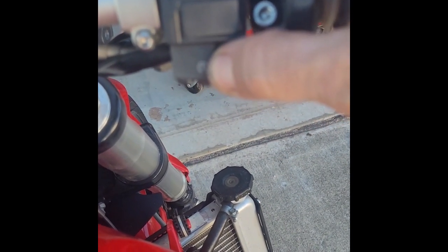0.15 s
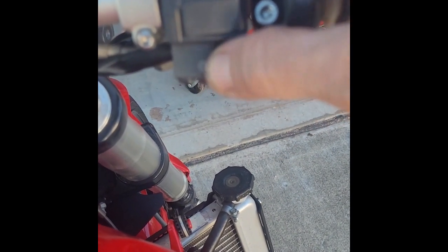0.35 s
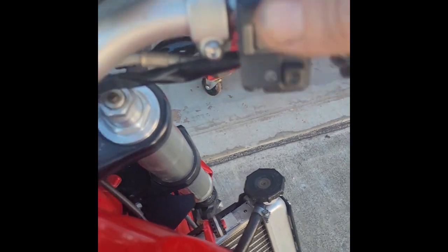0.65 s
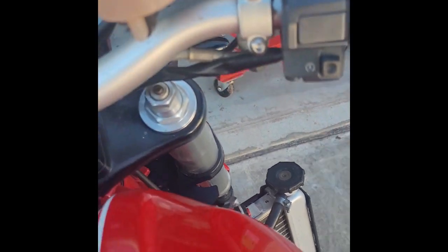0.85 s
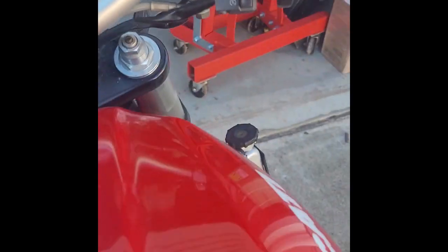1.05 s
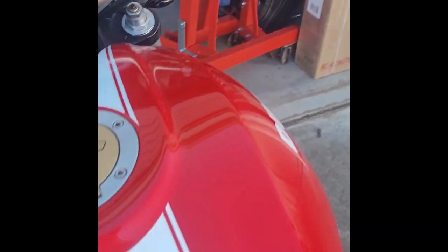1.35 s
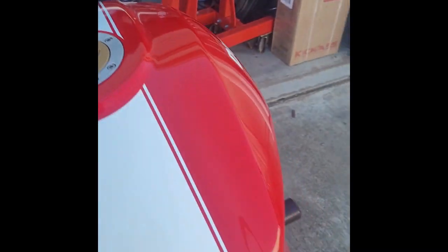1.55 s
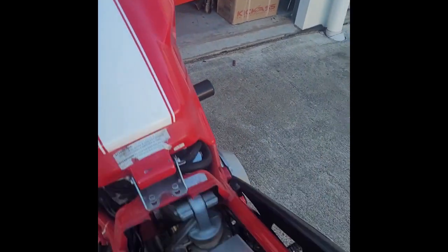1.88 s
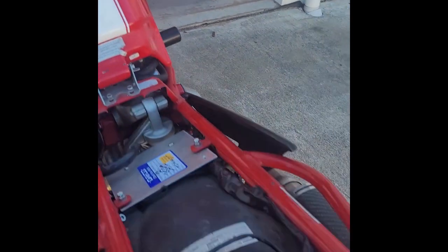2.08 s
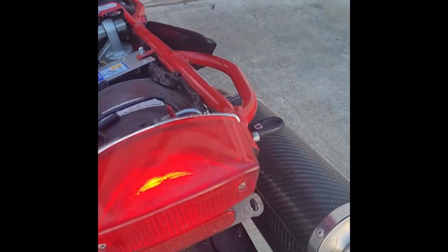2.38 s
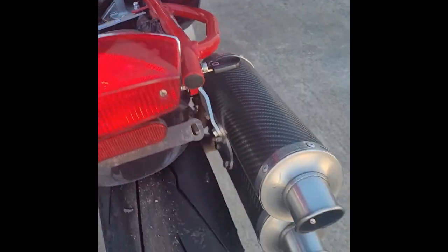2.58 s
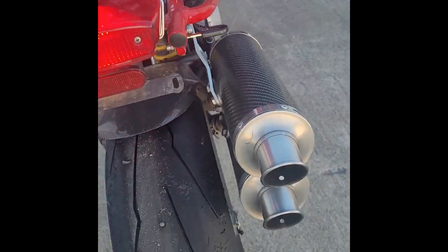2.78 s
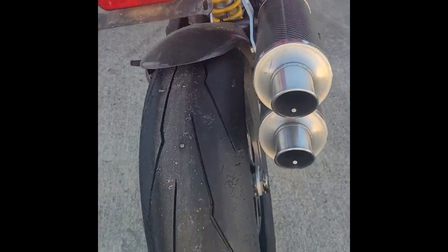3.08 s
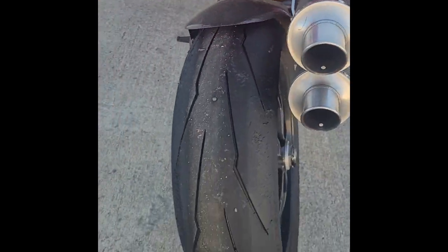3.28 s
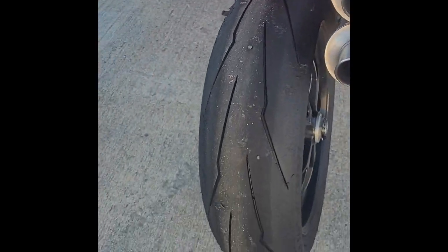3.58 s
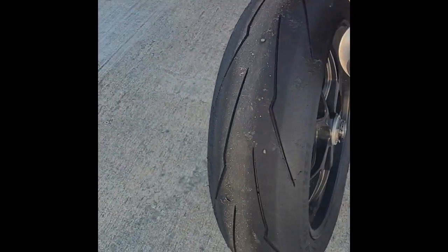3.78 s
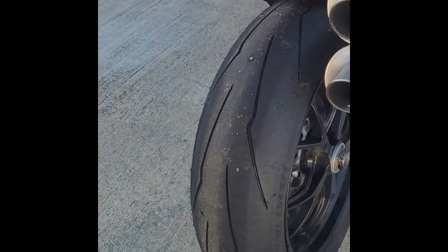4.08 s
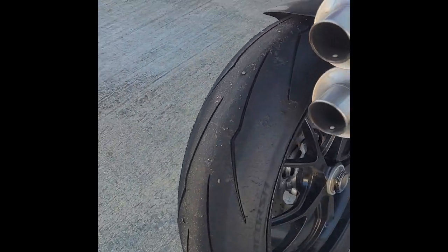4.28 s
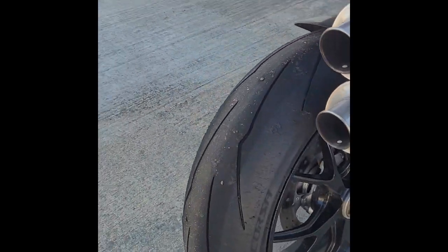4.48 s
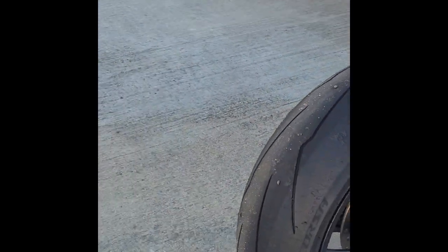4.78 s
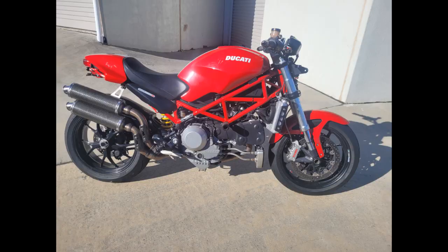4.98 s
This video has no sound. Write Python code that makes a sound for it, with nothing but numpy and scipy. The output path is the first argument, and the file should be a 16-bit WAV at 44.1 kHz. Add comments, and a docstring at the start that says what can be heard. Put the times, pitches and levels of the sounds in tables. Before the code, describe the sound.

A starter whirrs and knocks, a twin-cylinder motorcycle coughs and limps to life, then idles with deep lumpy exhaust before an abrupt cutoff.

```python
"""A starter whirrs and knocks, a V-twin motorcycle engine coughs, limps on one cylinder, then idles.
Each exhaust pulse rings damped pipe modes and spits a puff of hiss; impulses ring the engine cases
over a wash of gear noise, and band-passed noise makes the hiss and intake.
The listener walks from handlebar to mufflers: clatter, hiss, intake and muffler noise follow distance.
The sound stops dead."""
import sys
import numpy as np
from scipy import signal
from scipy.io import wavfile

SR = 44100
rng = np.random.default_rng(int(sys.argv[2]) if len(sys.argv) > 2 else 0)


def log_audio(samples):
    """Write samples as a 16-bit WAV file to the path given in sys.argv[1]."""
    # one column per channel
    frames = np.atleast_2d(samples).T
    # limit to full scale, then quantise
    limited = np.clip(frames, -1, 1)
    pcm = np.round(limited * 32767).astype(np.int16)
    wavfile.write(sys.argv[1], SR, pcm)


N = 226696
TIME = np.arange(N) / SR
STOP_S = 4.892

# listener's walk past the bike: start_s, behind_handlebar_m, left_ear_lag_ms, left_minus_right_db
WALK = [(.6, 0.025, 0.36, -0.3), (1.35, 0.27, 0.47, -1.8), (2.1, 0.78, 0.31, -1.4), (2.8, 1.54, 0.14, -.6),
        (3.7, 1.95, 0.074, -1.0), (4.9, 1.736, 0.19, -0.2)]
# gas temperature shifts the pipe resonances: start_s, tuning_ratio
WARMTH = [(.2, 0.88), (.4, 0.935), (.8, 0.908), (1.0, 1.0)]
# cylinder 0 coughs on the starter: start_s, push_gain (below 0 sucks gas back), boom_gain
COUGHS = [(0.1498, 0.86, 0.39), (.247, 0.82, 0.44), (.340, -1.04, 0.073), (0.4065, 0.89, 0.23)]

# source positions: (m behind the handlebar, m aside from the listener's path)
ENGINE_AT_M, AIRBOX_AT_M, MUFFLERS_AT_M = (0.14, 0.48), (0.78, 0.42), (1.85, 0.44)


def from_db(db):
    """Decibels to gain."""
    return 10 ** (np.asarray(db) / 20)


def rms_one(x):
    """Scale to unit rms."""
    return x / np.sqrt(np.mean(x ** 2) + 1e-20)


def read(rows, at=TIME):
    """Columns of a curve, interpolated at the given times."""
    s, *columns = np.transpose(rows)
    return [np.interp(at, s, c) for c in columns]


def clicks(times_s, sizes):
    """Single-sample impulses."""
    samples = np.round(np.asarray(times_s) * SR).astype(int)
    return np.bincount(np.clip(samples, 0, N - 1), sizes, N)


def spread(x, width_ms):
    """Round off each impulse to a Gaussian bell of unit area."""
    age_ms = np.arange(-600, 601) * 1000 / SR
    bell = np.exp(-.5 * (age_ms / width_ms) ** 2)
    return signal.fftconvolve(x, bell / bell.sum(), "same")


def delay(x, lag_ms):
    """Read a signal later by a fixed or moving lag; a negative lag reads it earlier."""
    return np.interp(TIME - lag_ms / 1000, TIME, x)


def die_away(x, t60_s):
    """Each impulse becomes an exponential that falls 60 dB in t60_s."""
    return signal.lfilter([1], [1, -from_db(-60 / (t60_s * SR))], x + 1e-18)


def bandpass(x, order, low_hz, high_hz):
    """Butterworth band-pass."""
    return signal.sosfilt(signal.butter(order, [low_hz, high_hz], "band", fs=SR, output="sos"), x)


def highpass(x, cut_hz):
    """First-order Butterworth high-pass."""
    return signal.sosfilt(signal.butter(1, cut_hz, "high", fs=SR, output="sos"), x)


def noise(spectrum, likeness, alike_below_hz=30):
    """Stereo noise from half-octave bands, more alike in both ears toward the bass; rms 1."""
    out, edges_hz = 0, 125 * 2 ** np.arange(-1.5, 7.5, .5)
    white = rng.standard_normal((2, 2, N))
    hz, db = np.transpose(spectrum)
    for k, (low, high) in enumerate(zip(edges_hz, edges_hz[1:])):
        level_db = np.interp(np.log(low * high) / 2, np.log(hz), db, left=-80)
        alike = likeness + (1 - likeness) / (1 + (low / alike_below_hz) ** 2)
        alike = np.clip(alike, -1, 1)
        mid, side = bandpass(white[k % 2], 2, low, high)
        ears = np.sqrt(1 + alike) * mid + np.sqrt(1 - alike) * side * [[1], [-1]]
        out = out + from_db(level_db) * ears
    return rms_one(out)


def nearness(place_m):
    """Gain of a source as the listener walks past it: one over the distance."""
    along_m, aside_m = place_m
    return 1 / np.hypot(read(WALK)[0] - along_m, aside_m)


def surroundings(x, shade=0.32, shade_hz=800, echo_db=-12):
    """Ground, tank and garage front throw back echoes; the tank shades the middle range on the left."""
    ears = []
    for ear in x:
        echoes = sum(delay(ear, ms) for ms in rng.uniform(1.998, 20, size=4))
        ears.append(ear + from_db(echo_db) * echoes)
    left, right = ears
    middle = bandpass(left, 1, shade_hz / 2, shade_hz * 2)
    return np.array([left - shade * middle, right])


def cranking(engage_s=0.046, let_go_s=0.3, run_down_s=0.15):
    """1 while the starter drives the engine, falling away exponentially once it is let go."""
    return (TIME > engage_s) * np.exp(-np.maximum(TIME - let_go_s, 0) / run_down_s)


def engine_effort(rise_s=0.15, at_rest=0.48, cranking_db=5.5):
    """Gain of engine noise: builds up at the start and is louder under the starter."""
    return np.clip(TIME / rise_s, at_rest, 1) * from_db(cranking_db * cranking())


def crank_times(angle):
    """Times (s) when the running engine passes a given share of its four-stroke cycle (two turns)."""
    # engine speed, limping then idling: start_s, speed_rpm
    speed = [(0.4, 1720), (0.51, 1456), (0.8, 1468), (0.91, 1684), (1.59, 1732), (1.79, 1701), (3.34, 1692),
             (4.17, 1700), (4.25, 1588), (4.36, 1793), (4.44, 1607), (4.8, 1684)]
    runs_s = .3638  # the second cylinder starts to fire
    cycles = np.cumsum(read(speed)[0]) / (120 * SR)
    cycles = cycles - np.interp(runs_s, TIME, cycles)
    s = np.interp(np.arange(int(cycles[-1])) + angle, cycles, TIME)
    return s[s < STOP_S]


def firings(uneven_db=0.4, jitter_ms=0.29):
    """Rows (s, cylinder, push, boom): 0 coughs, misfires, catches; idle gaps near 270 and 450 degrees."""
    back_sucks_s, catch_s = .45, .85  # misfires begin; from catch_s both cylinders fire
    first_cylinder_lead, misfire_lead = .366, .29  # share of a cycle ahead of cylinder 1
    misfire_push = -0.57  # an unfired cylinder sucks gas back
    limp_push, limp_boom = 0.77, 0.18  # cylinder 1 while it runs alone
    firing_db = (0.87, 1)  # idle pulse of each cylinder
    weak_db, recover_s = 4.5, 0.58  # cylinder 0 is weak when it catches, then recovers

    rows = [(s, 0, push, size) for s, push, size in COUGHS]
    for s in crank_times(-misfire_lead):
        if back_sucks_s < s < catch_s:
            rows.append((s, 0, misfire_push, 0))
    for s in crank_times(-first_cylinder_lead):
        if s > catch_s:
            weakness_db = weak_db * np.exp((catch_s - s) / recover_s)
            rows.append((s, 0, from_db(firing_db[0] - weakness_db), 0))
    for s in crank_times(0):
        if s < catch_s:
            rows.append((s, 1, limp_push, limp_boom))
        else:
            rows.append((s, 1, from_db(firing_db[1]), 0))
    s, cylinder, push, size = np.transpose(rows)
    late, strong = rng.standard_normal((len(s), 2)).T
    return np.column_stack([s + jitter_ms / 1000 * late, cylinder,
                            push * from_db(uneven_db * strong), size])


def hiss(broad_db=-53.5, sizzle_db=-66):
    """The engine hisses broadly, with a narrow bright sizzle at the front; both are filtered noise."""
    # broad hiss: band_hz, level_db per Hz (relative)
    hiss_spectrum = [(2500, -27), (4000, 32), (6300, -34.5), (9500, 4), (12000, 4.5), (16000, -6.5)]
    sizzle_hz, sizzle_width_hz = 9460, 380
    sizzle_at_m = (0, 0.58)
    white = rng.standard_normal((2, N))
    sizzle = rms_one(bandpass(white, 1, sizzle_hz - sizzle_width_hz / 2, sizzle_hz + sizzle_width_hz / 2))
    sizzle = from_db(sizzle_db) * nearness(sizzle_at_m) * (TIME > COUGHS[0][0]) * sizzle
    broad = from_db(broad_db) * nearness(ENGINE_AT_M) * noise(hiss_spectrum, likeness=0.63)
    return engine_effort() * (broad + sizzle)


def intake(pulses, level_db=-48, gulp=0.59, gulp_t60_s=0.044, gulp_after_ms=18.0):
    """A gulp of air follows each pulse: resonant airbox noise swells and dies away."""
    # airbox resonances: centre_hz, width_hz, level_db
    airbox_modes = [(1215, 260, -6), (1524, 440, -2), (1964, 140, -5)]
    white, air = rng.standard_normal((2, N)), 0
    for hz, width_hz, db in airbox_modes:
        air = air + from_db(db) * bandpass(white, 2, hz - width_hz / 2, hz + width_hz / 2)
    draws = clicks(pulses[:, 0] + gulp_after_ms / 1000, np.ones(len(pulses)))
    draws = rms_one(die_away(spread(draws, 2), gulp_t60_s))
    gulping = rms_one(1 - gulp + gulp * draws)
    return from_db(level_db) * nearness(AIRBOX_AT_M) * gulping * rms_one(air)


def starter(level_db=-26.5, sag_db_per_s=12.5, rough=.09, rough_t60_s=0.0069, overtone_db=-14):
    """The starter's gears spin up and whirr: harmonics of the mesh rate at an unsteady pitch."""
    mesh_hz, spin_up_s = 720, .022  # full-speed gear mesh; time constant to reach it
    hz = mesh_hz * (1 - np.exp(-TIME / spin_up_s))
    wander = rms_one(die_away(rng.standard_normal(N), rough_t60_s))
    phase = 2 * np.pi * np.cumsum(hz * (1 + rough * wander)) / SR
    level = from_db(level_db - sag_db_per_s * TIME) * cranking()
    overtones = np.sin(2 * phase) + np.sin(3 * phase) / 2
    return level * (np.sin(phase) + from_db(overtone_db) * overtones)


def cases(times_s, sizes, vary_db=4):
    """Metal contacts ring damped engine-case modes, each with a random strength and sign."""
    # engine-case modes: pitch_hz, level_db, t60_s
    case_modes = [(623, 0, 0.042), (693, 5.5, .025), (1001, -10.5, 0.07), (1707, -11, 0.025),
                  (1888, -8.5, 0.048), (2200, -5, 0.021), (2507, -5, 0.02), (3475, -21, 0.06),
                  (4510, -13.5, 0.028)]
    out = np.zeros(N)
    for hz, db, t60_s in case_modes:
        r, w = from_db(-60 / (t60_s * SR)), 2 * np.pi * hz / SR
        signs = rng.choice([-1, 1], len(times_s))
        strengths = from_db(db + vary_db * rng.standard_normal(len(times_s)))
        hits = clicks(times_s, sizes * signs * strengths)
        out += signal.lfilter([0, np.sin(w)], [1, -2 * r * np.cos(w), r * r], hits + 1e-18)
    return out


def machinery(level_db=-34.5, wash_db=2.5, rattle_db=-4, uneven_db=2.0, loose_db=-7, throb=0.41,
              tick_t60_s=0.036, knock_db=-5, knock_ring_db=-16, knock_t60_s=0.053):
    """Gear lash and loose clutch plates rattle in gear noise; hard knocks ring the cases."""
    # lash in clutch and gears: cycle_share, level_db
    lash_angles = [(.03, -4), (.16, -3), (.5, 0), (.84, 1)]
    # starter and clutch knocks: start_s, level_db (before the knock gains)
    knocks = [(0.038, -15.5), (0.056, -10), (0.122, -32.5), (0.17, -7), (0.229, -10.5), (0.263, -9.5),
              (0.315, -10.5), (0.349, -11.5), (0.393, -20), (0.827, -16), (1.369, -16.5)]
    # gear noise: band_hz, level_db per Hz (relative)
    clatter_spectrum = [(45, 20.5), (80, 3.5), (150, 7), (300, 8), (480, -12), (700, 13.5), (900, -8.5),
                        (1300, 1.5), (2000, -13.5), (2600, -11), (3200, -18.5), (4800, -22.5), (6500, -22),
                        (15000, -36.5)]

    lash = [(s, db) for angle, db in lash_angles for s in crank_times(angle)]
    loose = [(s, loose_db) for s in rng.uniform(0, STOP_S, size=600)]
    times_s, levels_db = np.transpose(lash + loose)
    sizes = from_db(levels_db + uneven_db * np.clip(rng.standard_normal(len(times_s)), -2, 2))
    rattle = rms_one(np.array([cases(times_s, sizes) for ear in range(2)]))

    wash = noise(clatter_spectrum, likeness=0.54, alike_below_hz=1100)
    ticks = rms_one(die_away(clicks(times_s, sizes), tick_t60_s))
    flutter = rms_one(1 - throb + throb * ticks)
    level = from_db(level_db) * engine_effort() * nearness(ENGINE_AT_M)
    running = level * (from_db(wash_db) * flutter * wash + from_db(rattle_db) * rattle)

    s, db = np.transpose(knocks)
    thuds = from_db(knock_db) * die_away(clicks(s, from_db(db)), knock_t60_s) * wash
    return running + thuds + cases(s, from_db(db + knock_ring_db))


def jet(pulses, jet_db=-59, leak_db=-54.5, rasp_db=-41.5, puff_ms=1.2, early_ms=1.5, uneven_db=2.5,
        stroke_share=.16, stroke_ms=1.2, stroke_after_ms=13.0, trail_share=0.81, trail_t60_s=0.045,
        rasp_t60_s=0.14):
    """Each outward pulse gates noise: a bright trailing puff, a weaker stroke puff and a muffler rasp."""
    # jet is loudest in line with the mufflers' mouths: start_s, gain_db
    aim = [(2.9, 3.5), (3.2, 4.5), (3.75, 4.5), (4.1, 6), (4.4, -0.5)]
    # puff and rasp spectra: band_hz, level_db per Hz (relative)
    puff_spectrum = [(2000, 7), (4000, -1), (6300, 0.5), (8500, -1), (12000, 12), (16000, 3)]
    rasp_spectrum = [(120, -2), (250, 22), (430, 14.5), (650, -14.5), (850, -9), (1400, -4), (2100, -18.5),
                     (2700, -8.5), (4200, -7.5), (6000, -26)]
    leak_by_cylinder = (.45, 1)  # hiss that escapes at the cylinder heads

    s, cylinder, push, _ = pulses.T
    kicks = np.maximum(push, 0) * from_db(uneven_db * rng.standard_normal(len(s)))
    at_mufflers = np.interp(s, TIME, from_db(jet_db + read(aim)[0]) * nearness(MUFFLERS_AT_M))
    at_heads = np.interp(s, TIME, from_db(leak_db) * nearness(ENGINE_AT_M))
    at_heads = at_heads * np.take(leak_by_cylinder, cylinder.astype(int))
    heard = np.hypot(at_mufflers, at_heads)

    spits = clicks(s - early_ms / 1000, kicks * heard)
    puff, stroke = rms_one(spread(spits, puff_ms)), rms_one(spread(spits, stroke_ms))
    trail = rms_one(die_away(puff, trail_t60_s))
    flow = puff + trail_share * trail + stroke_share * delay(stroke, stroke_after_ms)
    puffs = np.sqrt(np.mean(heard ** 2)) * rms_one(flow) * noise(puff_spectrum, likeness=0.73)

    rush = spread(clicks(s - early_ms / 1000, kicks), stroke_ms)
    rush = rms_one(die_away(rush, rasp_t60_s))
    rasp = from_db(rasp_db) * nearness(MUFFLERS_AT_M) * rush * noise(rasp_spectrum, likeness=0.25)
    return puffs + rasp


def boom(pulses, hot_hz=68, octave_share=0.24, t60_s=.42, after_ms=1.5):
    """The first heavy gulps of gas set the whole cold pipe swinging at its lowest note and octave."""
    out = np.zeros(N)
    for s, cylinder, push, size in pulses[pulses[:, 3] > 0]:
        age_s = np.maximum(TIME - s - after_ms / 1000, 0)
        phase = 2 * np.pi * hot_hz * read(WARMTH, s)[0] * age_s
        swing = np.sin(phase) + octave_share * np.sin(2 * phase)
        out += size * from_db(-60 * age_s / t60_s) * swing
    return out


def exhaust(pulses, blow_ms=0.69, stroke_ms=2.16, stroke_after_ms=12.96, stroke_share=1.0,
            vary=0.077, detune=0.02, early_ms=0.41):
    """A sharp blow-down, then the piston's softer stroke; both ring the damped pipe modes."""
    # exhaust resonances: pitch_hz, width_hz, cylinder_0_drive, cylinder_1_drive
    pipes = [(70.3, 14.63, -0.28, -0.15), (113.5, 9, -0.22, -0.084), (128.6, 17.9, -0.12, -0.19),
             (230.5, 37, -0.59, -0.45), (258.4, 22.6, -0.028, -0.58), (290.1, 18, -0.089, 0.38),
             (332.8, 20, 0.27, -0.14)]
    hz, width_hz, *drives = np.transpose(pipes)
    age_s, out = TIME[:SR // 6], np.zeros(N + SR)
    decay = np.exp(-np.pi * np.outer(width_hz, age_s))
    for s, cylinder, push, _ in pulses:
        # each charge burns a little hotter or cooler
        tuning = read(WARMTH, s)[0] * (1 + detune * rng.standard_normal())
        rings = decay * np.cos(2 * np.pi * np.outer(hz * tuning, age_s))
        drive = drives[round(cylinder)] * (1 + vary * rng.standard_normal(len(hz)))
        at = round((s - early_ms / 1000) * SR)
        out[at:at + len(age_s)] += push * drive @ rings
    blow_down = spread(out[:N], blow_ms)
    stroke = delay(spread(out[:N], stroke_ms), stroke_after_ms)
    return blow_down + stroke_share * stroke


def scene(exhaust_db=2.5):
    """The bike lies to the right at first, then nearly straight ahead."""
    pulses = firings()
    engine = surroundings(machinery() + starter())
    left, right = from_db(exhaust_db) * (exhaust(pulses) + boom(pulses)) + engine
    _, lag_ms, pan_db = read(WALK)
    left = delay(left, lag_ms / 2) * from_db(pan_db / 2)
    right = delay(right, -lag_ms / 2) * from_db(-pan_db / 2)
    return np.array([left, right]) + jet(pulses) + intake(pulses) + hiss()


def record(dry, left_cut_hz=26, bass_cut_hz=14, top=0.94, cutoff_hz=16300):
    """The left port passes less bass; peaks are rounded, the sound stops dead and the top is cut."""
    ports = np.array([highpass(dry[0], left_cut_hz), dry[1]])
    ports = highpass(ports, bass_cut_hz)
    rounded = ports / (1 + (ports / top) ** 8) ** (1 / 8)
    top_cut = signal.ellip(10, .1, 90, cutoff_hz, fs=SR, output="sos")
    return signal.sosfilt(top_cut, rounded * (TIME < STOP_S))


dry = scene()
out = record(dry)
log_audio(out)
```